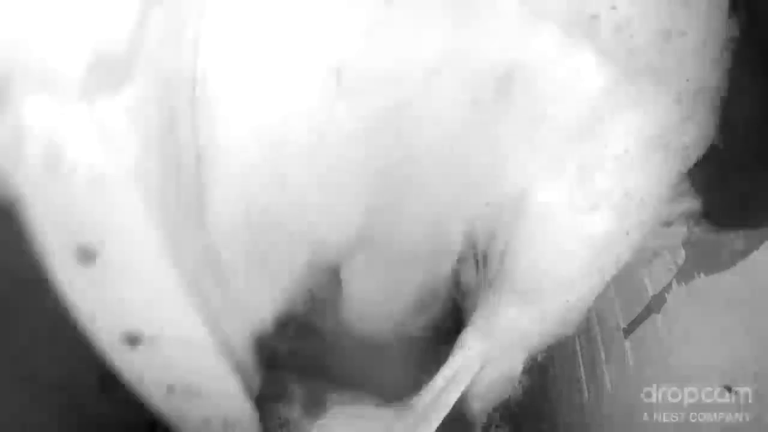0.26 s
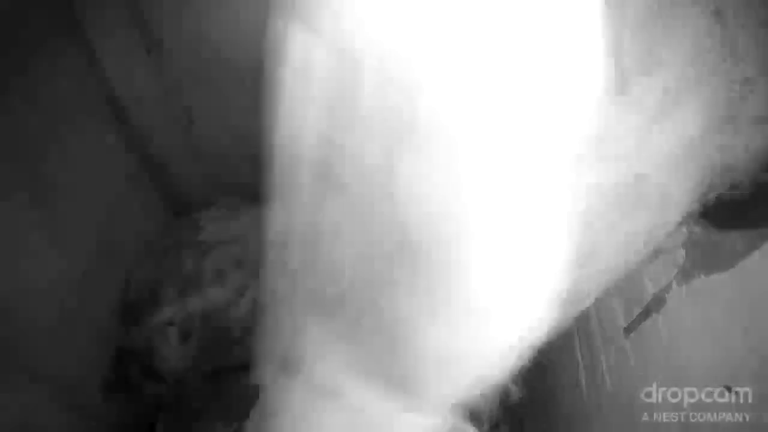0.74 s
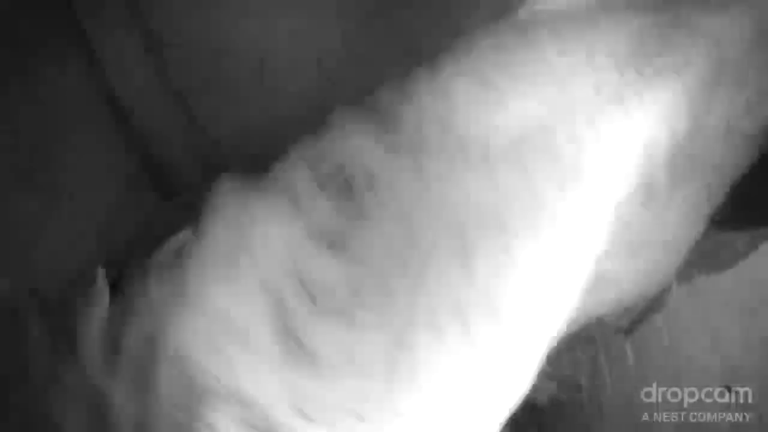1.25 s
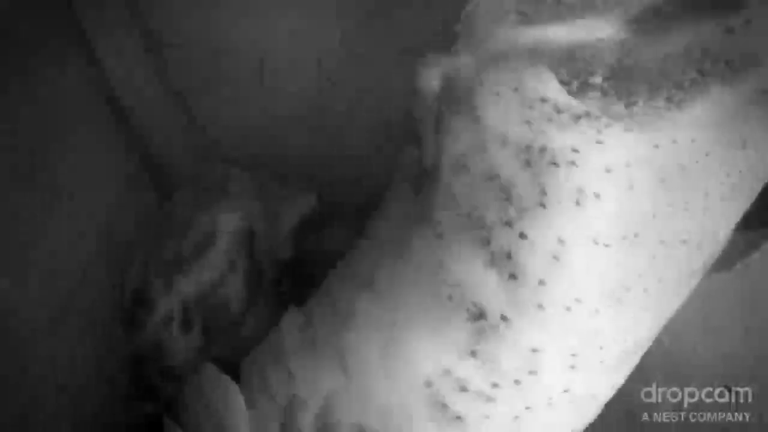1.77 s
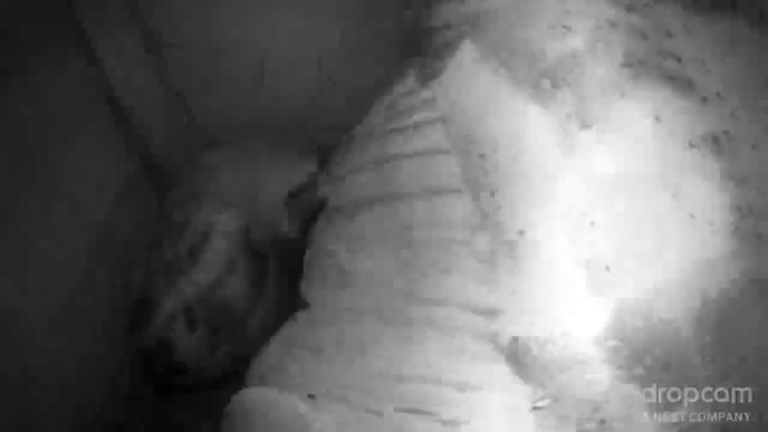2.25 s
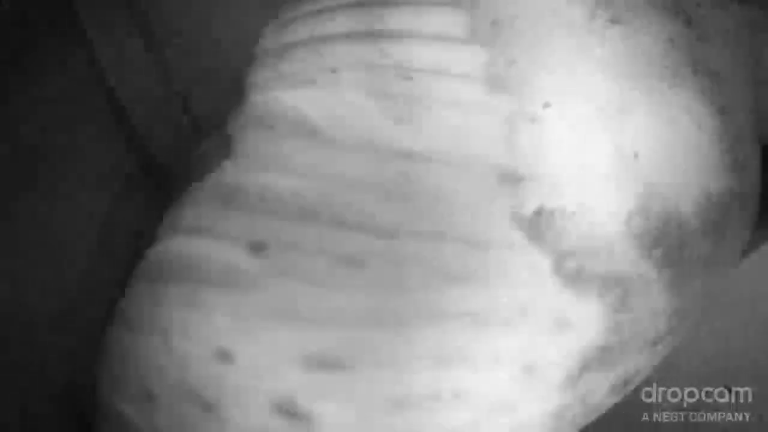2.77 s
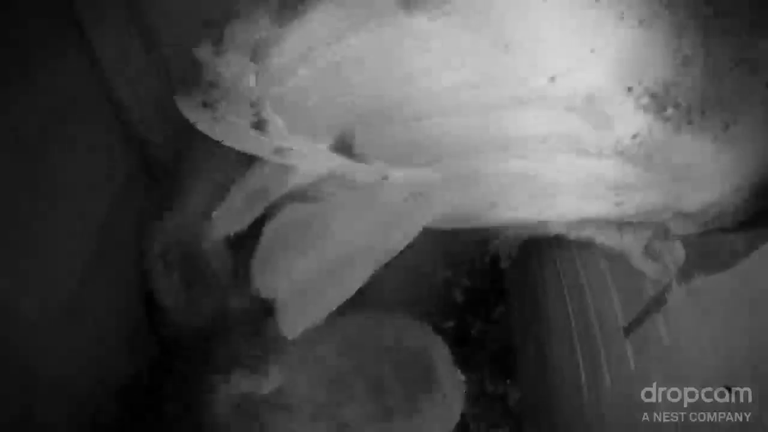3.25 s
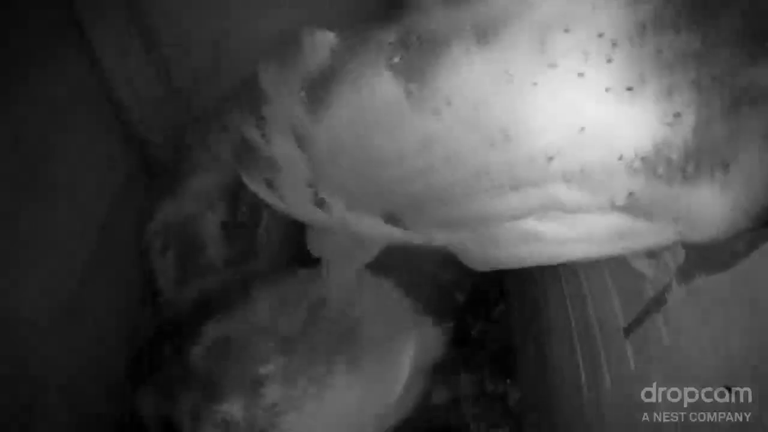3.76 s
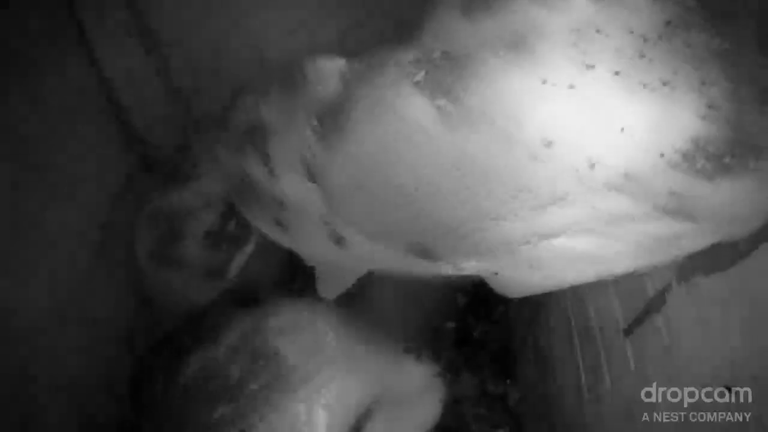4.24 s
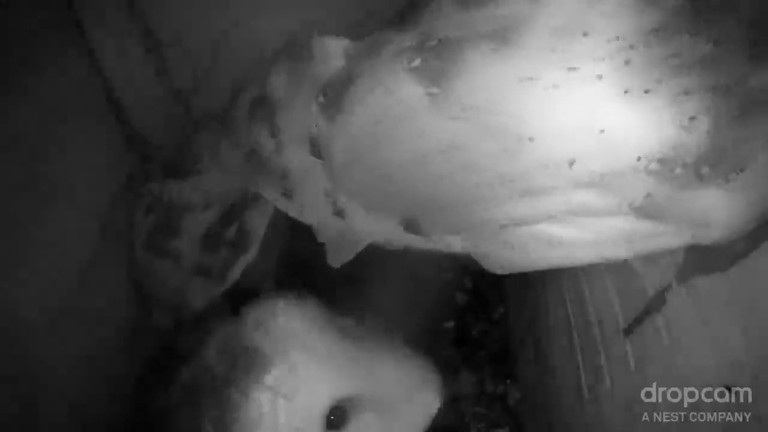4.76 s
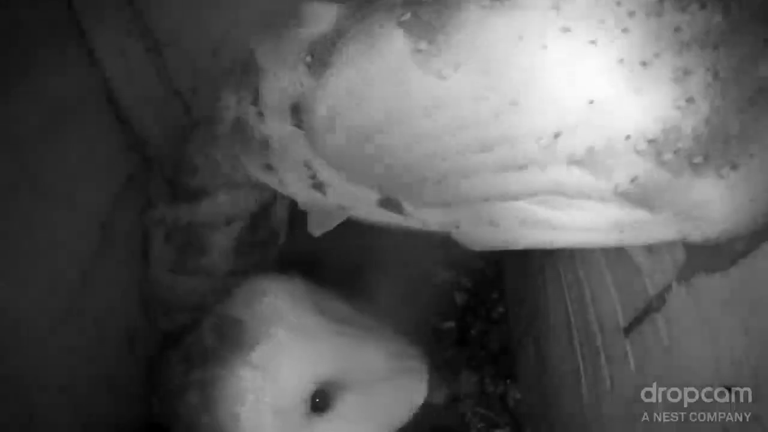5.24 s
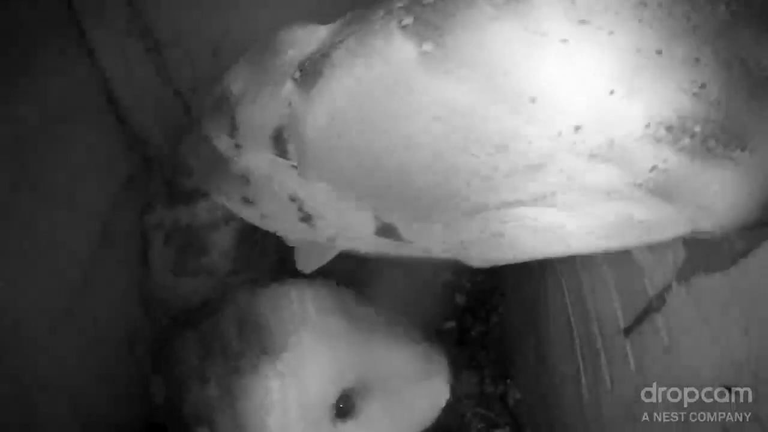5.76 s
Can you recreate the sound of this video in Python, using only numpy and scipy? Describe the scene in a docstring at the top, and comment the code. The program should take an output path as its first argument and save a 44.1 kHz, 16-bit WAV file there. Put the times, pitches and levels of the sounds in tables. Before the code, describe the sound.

Close inside a wooden box, birds thump and scuff the boards, feathers rustling drily, then settle into sparse, softer knocks.

```python
"""Young owls shuffle about in a wooden nest box, heard close up by a small microphone inside it.
Feet and wings knock the boards: each blow feeds short low modes, and the whole box rumbles on.
Bodies rub the wood in stick-slip, feathers crackle as coloured noise, claws and beaks tick as runs of slips.
Outdoor air noise seeps in through the entrance, and the boards hum faintly with it."""
import sys
import numpy as np
from scipy import signal
from scipy.io import wavfile
from scipy.ndimage import uniform_filter1d

SR = 44100
rng = np.random.default_rng(int(sys.argv[2]) if len(sys.argv) > 2 else 0)


def wrap_up_sound(samples):
    """Save the sound to the file named by the first command line argument, as 16-bit audio."""
    columns = np.atleast_2d(samples).T
    # keep every value between -1 and 1, then stretch to whole-number steps
    tamed = np.clip(columns, -1, 1)
    steps = np.round(tamed * 32767).astype(np.int16)
    wavfile.write(sys.argv[1], SR, steps)


N = 265041

# Box modes, one list each for base frame, floor board, back wall, side walls, lid and whole box.
# Each row: frequency in Hz, relative level in dB, ring time to -60 dB in seconds.
BOX_MODES = [
    [(232.5, -20, 0.046), (254.3, -20.5, 0.043)],
    [(286.7, -10.5, 0.17), (320.4, 1, 0.13)],
    [(383, 2, 0.2), (423.6, 9.5, 0.083)],
    [(534.1, 9, 0.095), (598, 5, 0.084), (700, 6, 0.064)],
    [(768, -13.5, 0.066), (871.6, -8, 0.06), (1027, -17.5, 0.053)],
    [(44.3, -10, 0.2), (77, -21.5, 0.66), (151, -1, 0.052), (194, -8, 0.028)],
]
WHOLE_BOX = BOX_MODES[-1]

# Colour of the outdoor air inside the box. Each row: frequency in Hz, relative level per hertz in dB.
AIR_SPECTRUM = [(18, -66), (30, -5.5), (81, -12.5), (229, -24), (399, -2), (539, 2), (727, -1), (798, -4.5),
                (895, 4.5), (1150, -13.5), (4720, -21), (6380, -28.5), (7500, -59.5), (9000, -75)]
AIR_DB, AIR_IN_BOARDS_DB = -62.5, -69

# Brushes of wing and body along the boards. Each row: start in seconds, hold in seconds, rubbing in dB,
# feathers (quills) in dB, barbs relative to the quills in dB.
BRUSHES_ALONG_BOARDS = [(0.0, 0.028, -50, -64.5, 6.5), (0.248, 0.044, -56, -62.5, 0.5),
                        (0.283, 0.069, -50, -64.5, 5.5), (0.767, 0.088, -66.5, -69.5, 3.5),
                        (0.949, 0.066, -56, -60, -6.5), (1.046, 0.041, -52.5, -52, -9),
                        (1.16, 0.054, -53.5, -58.5, -11), (1.226, 0.021, -59, -52, -12),
                        (1.26, 0.041, -54, -59, -7.5), (1.349, 0.061, -49.5, -51, -5.5),
                        (1.522, 0.024, -41.5, -46.5, -13), (1.58, 0.054, -45.5, -51.5, 1),
                        (1.667, 0.012, -40, -56.5, -1), (1.725, 0.014, -63, -60.5, -2),
                        (1.79, 0.16, -56.5, -64, -2.5), (2.139, 0.018, -49.5, -57, -9),
                        (2.309, 0.055, -50, -63, 3.5), (2.453, 0.014, -38, -44, -10.5),
                        (2.57, 0.15, -76, -72.5, 2.5), (2.79, 0.082, -61, -69, 3),
                        (2.978, 0.068, -57.5, -61, 0.5), (3.089, 0.018, -50.5, -55.5, -3.5),
                        (3.168, 0.052, -46, -63, -5.5), (3.398, 0.089, -52.5, -60, -11),
                        (3.61, 0.016, -59.5, -64, -6), (3.835, 0.015, -63, -64, -7),
                        (4.296, 0.014, -52, -74.5, -1), (5.167, 0.11, -59.5, -72, -5.5),
                        (5.399, 0.046, -54, -71.5, -4), (5.7, 0.11, -59, -72, -19)]
BRUSH_RISE_DB_PER_S, BRUSH_FALL_DB_PER_S = 315, 224

# Small stirrings at rest. One row: rubbing in dB, quills in dB, barbs in dB.
STIRRINGS_AT_REST = [-70.5, -75, -82]

# Dull feather noise of the quills. Each row: frequency in Hz, relative level per hertz in dB.
QUILL_SPECTRUM = [(590, -3.5), (1000, -2), (1270, -16.5), (1520, 1), (2360, -20), (2600, -10.5),
                  (3380, -56), (5720, -120)]

# Bright feather noise of the barbs. Each row: frequency in Hz, relative level per hertz in dB.
BARB_SPECTRUM = [(1530, -6.5), (2600, 4.5), (4030, 5), (4530, -1), (6030, 0), (7230, -8.5), (8670, -28.5),
                 (11300, -88)]

# Upper modes of the air in the box.
# Each row: frequency in Hz, width in Hz, nominal lift in dB (half of it, times UPPER_SHARE, is mixed in).
BOX_AIR_MODES = [(1337, 33, 12.5), (2163, 30, 10.5)]
UPPER_SHARE = 0.69

# Knocks on the wood. Each row: start in seconds, strength in dB, spot struck (-1 base frame, 0 floor board,
# 1 back wall, 2 side walls, 3 lid), loss per part away from the spot in dB, thump of the whole box in dB,
# dull scratch in dB, bright scratch relative to the dull in dB, contact time in seconds.
BLOWS = [(0.261, -21.5, 1.39, 10, -34, -44, -10, 0.005), (0.369, -30.5, 1.33, 6, -65, -51, -12, 0.0038),
         (0.38, -35.5, 2.5, 14, -65, -67, -11, 0.0041), (0.679, -52.5, 2.5, 1.5, -84, -62, -4, 0.00084),
         (1.372, -32, 1.5, 11.5, -67, -70, -23, 0.0096), (1.39, -29, 1.37, 14.5, -70, -70, -20, 0.0068),
         (1.5015, -9.5, -0.5, 5, -32.5, -39.5, -0.5, 0.0011),
         (1.519, -16.5, 1.56, 21.5, -27, -52, 5, 0.004), (1.584, -34.5, 0, 13, -60.5, -48, 5, 0.0099),
         (1.596, -29, 3.5, 3, -43, -40, -15, 0.0027), (1.635, -19.5, 2, 12, -59, -59, -10, 0.0069),
         (1.6415, -10.5, 1.5, 9, -24, -49, -8, 0.0011), (1.648, -14, 3, 5, -44.5, -58, -10, 0.0013),
         (1.839, -35, 0.9, 8.5, -41, -83, -21, 0.002), (2.138, -36, 2.5, 18, -42, -44.5, 5.5, 0.013),
         (2.147, -21.5, 1.5, 10.5, -43, -34, -3.5, 0.0073), (2.416, -30, 1.4, 4.5, -61, -43, 13, 0.019),
         (2.433, -20.5, 3, 15, -55, -47, -30, 0.011), (2.469, -19.5, 2, 5, -25, -55, -29, 0.0051),
         (2.842, -38.5, -1, 16, -47, -57, -32, 0.016), (3.082, -37.5, 2.7, 6.5, -72, -63, 9, 0.013),
         (3.107, -34.5, 0.86, 11, -45, -66, -10, 0.0027), (3.137, -42.5, 2, 17, -60, -58, -26, 0.0047),
         (3.151, -33, 0.46, 12, -54, -75, -12, 0.003), (3.222, -27, 0.13, 12, -41.5, -80, -13, 0.001),
         (3.473, -35, 1.56, 11.5, -65, -89, 0, 0.0089), (3.814, -49.5, 1.5, 13, -88, -87, -16, 0.0037),
         (4.277, -33, 1.62, 14.5, -48.5, -63, -18, 0.0042), (4.565, -43.5, 1.5, 23, -83, -87, -14, 0.0045),
         (4.815, -47, 3.5, 4, -54, -77, -9, 0.015), (4.874, -44, 1.5, 6.5, -54, -95, -10, 0.0059),
         (4.95, -30, 0.32, 13, -44, -68, -9, 0.0071), (5.15, -32, 0.5, 18.5, -77, -88, -11, 0.021),
         (5.243, -52, 1, 13, -82, -75, -15, 0.0024), (5.386, -27, 1.2, 11, -39.5, -58, -12.5, 0.004),
         (5.41, -33.5, 0.2, 16, -66, -78, -8, 0.002), (5.429, -32.5, 1, 15, -47, -74, -16, 0.014),
         (5.802, -18, 4, 6.5, -47.5, -42, -26, 0.0061), (5.867, -39, 2, 11, -54, -76, -16, 0.018),
         (5.903, -34, 1.05, 21.5, -77, -82, -9, 0.0026), (5.952, -37.5, 1.5, 21, -72, -75, -7, 0.006)]
CHATTER = 0.3   # share of rough, uneven pushing in a touch
SCRATCH_S = 0.0057
TOUCH_SAMPLES = 3000   # longest touch worked out

# After a knock the bird settles and the boards murmur on.
SETTLE_DB, SETTLE_DELAY_S, SETTLE_T60_S = -22.5, 0.12, 0.52

# After a thump the whole box rocks on its mount.
RUMBLE_DB, RUMBLE_T60_S = -12.5, 0.55   # level relative to the thump

# Ticks and short scrapes of claw or beak. Each row: start in seconds, strength in dB, pitch struck in Hz,
# loss per octave away from that pitch in dB, length in seconds.
CLAW_TICKS = [(0.262, -42, 1720, 20, 0.01), (0.279, -43, 3700, 16, 0.016), (0.298, -43, 4600, 6, 0.025),
              (0.322, -57, 3000, 16, 0.013), (0.366, -54, 1880, 14, 0.017), (1.231, -37, 1430, 29, 0.021),
              (1.4997, -34.5, 2980, 7.5, 0.008), (1.518, -25.5, 2800, 25, 0.011),
              (1.558, -39, 3180, 18, 0.012), (1.578, -32, 4580, 6, 0.013), (1.598, -31, 2600, 5, 0.02),
              (1.643, -31.5, 2400, 7, 0.013), (1.653, -30.5, 3120, 18, 0.014),
              (1.788, -43.5, 3000, 17, 0.015), (2.138, -25, 2100, 40, 0.0025),
              (2.146, -18.5, 1980, 37, 0.0038), (2.414, -36, 3030, 9, 0.009), (2.434, -32, 2120, 19, 0.014),
              (2.469, -35.5, 1590, 27, 0.036), (3.094, -51, 3480, 10, 0.016), (4.278, -52, 2000, 4, 0.0052),
              (4.955, -59, 2500, 15, 0.007), (5.387, -44.5, 2440, 24, 0.008), (5.39, -40, 3770, 26, 0.039),
              (5.793, -40, 1200, 28, 0.0046), (5.804, -27.5, 1690, 5, 0.01)]
SLIPS = 14   # in one scrape
SKID_LOSS_DB = 8.5   # over the full length of a scrape
TICK_SPREAD_DB = 2.5   # chance in how hard a tick finds each mode

# Short high modes of the wood that the ticks ring.
# Each row: frequency in Hz, relative level in dB, ring time to -60 dB in seconds.
GRAIN_MODES = [(1110, 4, 0.062), (1464, 7.5, 0.016), (1780, -3, 0.018), (1960, -4.5, 0.01),
               (2076, 1, 0.026), (2424, 0, 0.027), (2660, -4.5, 0.014), (3200, -3, 0.028),
               (3506, -2, 0.021), (3870, -5, 0.018), (4470, -7, 0.017), (6080, -21.5, 0.0077)]

MICROPHONE_LOW_HZ, MICROPHONE_TOP_HZ, CUTOFF_HZ = 105, 7480, 8829


def from_db(db):
    """Decibels to gain."""
    return 10 ** (np.asarray(db) / 20)


def rms_one(x):
    """Scaled to rms 1."""
    return x / np.sqrt(np.mean(x ** 2) + 1e-20)


def drift(rate_hz):
    """Slow chance: noise through a double one-pole low-pass, worked out at every 16th sample; spread 1."""
    r = np.exp(-32 * np.pi * rate_hz / SR)
    noise = rng.standard_normal(N // 16 + 3001)
    slow = signal.lfilter([1], [1, -2 * r, r * r], noise)[3000:]   # without the filter's start-up
    return np.interp(np.arange(N) / 16, np.arange(len(slow)), rms_one(slow))


def ring(x, hz, t60):
    """A damped resonator: a unit click sets a sine of height 1 ringing."""
    r = from_db(-60 / (t60 * SR))
    w = 2 * np.pi * hz / SR
    return signal.lfilter([0, np.sin(w)], [1, -2 * r * np.cos(w), r * r], x + 1e-18)


def ring_modes(x, modes):
    """All modes of a list ringing side by side at their levels."""
    return sum(from_db(db) * ring(x, hz, t60) for hz, db, t60 in modes)


def every_box_mode():
    """The modes of all parts of the box in one list."""
    return [mode for modes in BOX_MODES for mode in modes]


def coloured(x, spectrum, patchy_db):
    """Third-octave bands weighted by a spectrum, each flickering on its own; white rms 1 in, about rms 1 out."""
    hz, db = np.transpose(spectrum)
    edges = hz[0] * 2 ** np.arange(0, np.log2(hz[-1] / hz[0]), 1 / 3)
    out, power = 0, 0
    for low, high in zip(edges, edges[1:]):
        gain = from_db(np.interp(np.log(low * high) / 2, np.log(hz), db))
        band = signal.sosfilt(signal.butter(2, [low, high], "band", fs=SR, output="sos"), x)
        flicker = from_db(patchy_db * drift(22.0))
        out = -out + gain * band * flicker   # signs alternate so that neighbours add at their common edge
        power += 2 * gain ** 2 * (high - low) / (SR / 2)
    return out / np.sqrt(power)


def grains(per_s, spread_db):
    """Random micro-contacts of uneven size and either sign, rms 1."""
    sizes = from_db(spread_db * np.minimum(rng.exponential(1, N), 4))
    signs = rng.choice([-1, 1], N)
    happens = rng.random(N) < per_s / SR
    return rms_one(sizes * signs * happens)


def contact(seconds, rise):
    """Envelope of one touch: a rise (sharper for small values), then a dying skid; top 1."""
    t = np.arange(TOUCH_SAMPLES) / SR / max(seconds, 1e-3)
    return (2 * np.e * t / rise) ** rise * np.exp(-2 * t)


def outdoor_air():
    """Steady noise through the entrance, and the boards humming faintly with it."""
    wind = rng.standard_normal(N)
    boards = ring_modes(wind, every_box_mode())
    direct = coloured(rng.standard_normal(N), AIR_SPECTRUM, patchy_db=-1.1)
    return from_db(AIR_DB) * direct + from_db(AIR_IN_BOARDS_DB) * rms_one(boards)


def shuffling():
    """Gains of rubbing, quills and barbs: rest, plus each brush (swell, hold, fade), plus settling after knocks."""
    t = np.arange(0, N, 32) / SR
    power = from_db(STIRRINGS_AT_REST)[:, None] ** 2
    for s, hold_s, rub_db, quill_db, bright_db in BRUSHES_ALONG_BOARDS:
        before_db = BRUSH_RISE_DB_PER_S * np.maximum(s - t, 0)
        after_db = BRUSH_FALL_DB_PER_S * np.maximum(t - s - hold_s, 0)
        levels_db = np.c_[[rub_db, quill_db, quill_db + bright_db]]
        power = power + from_db(levels_db - before_db - after_db) ** 2
    for s, hit_db, *_ in BLOWS:   # settling only rubs the boards
        after = np.maximum(t - s, 0)
        fade = from_db(hit_db + SETTLE_DB - 60 * after / SETTLE_T60_S)
        power[0] += (fade * np.minimum(after / SETTLE_DELAY_S, 1)) ** 2
    return [np.interp(np.arange(N) / SR, t, np.sqrt(p)) for p in power]


def rubbing(gain):
    """Stick-slip of bodies on the boards keeps all modes murmuring in uneven surges."""
    slips = grains(1500, spread_db=1.5) * from_db(0.37 * drift(39))
    wood = 0
    for hz, db, t60 in every_box_mode():
        wood = wood + from_db(db + 4.0 * drift(7.9)) * ring(slips, hz, t60)
    return gain * rms_one(wood)


def feathers(gain, spectrum):
    """Thousands of tiny slips of feather and claw: a dense crackle in clumps, its colour shifting."""
    slips = grains(8000, spread_db=2.8) * from_db(2.2 * drift(50))
    return coloured(gain * slips, spectrum, patchy_db=3.2)


def hollow(x):
    """The enclosed air lifts a few narrow treble bands."""
    out = x.copy()
    for hz, width_hz, db in BOX_AIR_MODES:
        r = np.exp(-np.pi * width_hz / SR)
        top = (1 - r * r) / 2 * np.array([1, 0, -1])   # close to unit gain at the peak
        bottom = [1, -2 * r * np.cos(2 * np.pi * hz / SR), r * r]
        out += UPPER_SHARE * from_db(db / 2) * signal.lfilter(top, bottom, x)
    return out


def knocks():
    """Wood rung by each blow, strongest near the spot struck, over the whole time of contact."""
    s, hit_db, spot, loss_db, thump_db, _, _, contact_s = np.transpose(BLOWS)
    starts = np.round(s * SR).astype(int)
    shapes = np.array([contact(c, rise=0.42) for c in contact_s])
    area = shapes.sum(axis=1, keepdims=True)
    energy = np.sum(shapes ** 2, axis=1, keepdims=True)
    t = np.arange(TOUCH_SAMPLES) / SR
    wood = 0
    for part, modes in enumerate(BOX_MODES, start=-1):
        part_db = thump_db if modes is WHOLE_BOX else hit_db - loss_db * abs(part - spot)
        loudest_db = max(mode[1] for mode in modes)
        for k, (hz, db, t60) in enumerate(modes):
            # pushing in step with the mode feeds it over the whole touch
            swell = np.cos(2 * np.pi * hz * t) * (-1) ** k * 2 / area
            chatter = CHATTER * rng.standard_normal(shapes.shape) / np.sqrt(energy)
            touches = from_db(part_db + db - loudest_db)[:, None] * shapes * (swell + chatter)
            pushes = np.zeros(N + TOUCH_SAMPLES)
            for start, touch in zip(starts, touches):
                pushes[start:start + TOUCH_SAMPLES] += touch
            wood = wood + ring(pushes[:N], hz, t60)
    return wood


def knock_scratches():
    """How hard claws and quills scratch (dull, bright) during each knock, as brief gain envelopes."""
    scratch = np.zeros((2, N + TOUCH_SAMPLES))
    shape = contact(SCRATCH_S, rise=0.77)
    for s, _, _, _, _, dull_db, bright_db, _ in BLOWS:
        start = int(np.round(s * SR))
        scratch[:, start:start + TOUCH_SAMPLES] += from_db([[dull_db], [dull_db + bright_db]]) * shape
    return scratch[:, :N]


def rumble():
    """Low modes of the whole box, kept going by noise that dies after each thump."""
    power = np.zeros(N)
    for s, _, _, _, thump_db, *_ in BLOWS:
        power[round(s * SR)] = from_db(thump_db + RUMBLE_DB) ** 2
    power = signal.lfilter([1], [1, -from_db(-120 / (RUMBLE_T60_S * SR))], power)   # power, so twice 60
    gain = uniform_filter1d(np.sqrt(power), size=801, origin=400)   # softens each onset over 18 ms
    return gain * rms_one(ring_modes(rng.standard_normal(N), WHOLE_BOX))


def ticks():
    """Each scrape is a dying run of uneven slips; every slip rings the high modes near its pitch."""
    s, db, pitch_hz, loss_db, length_s = np.transpose(CLAW_TICKS)[:, :, None]
    along = np.sort(rng.random((len(CLAW_TICKS), SLIPS)), axis=1)
    along = along - along[:, :1]   # the first slip falls on the start
    when = np.round((s + length_s * along) * SR).astype(int)
    out = 0
    for hz, mode_db, t60 in GRAIN_MODES:
        away_db = loss_db * abs(np.log2(hz / pitch_hz))
        chance_db = TICK_SPREAD_DB * rng.standard_normal((len(CLAW_TICKS), 1))
        slip_db = db + mode_db - away_db + chance_db - SKID_LOSS_DB * along
        uneven = rng.standard_normal(along.shape) / np.sqrt(SLIPS)   # chance in strength and sign
        clicks = np.zeros(N)
        np.add.at(clicks, when, from_db(slip_db) * uneven)
        out = out + ring(clicks, hz, t60)
    return out


def scene():
    """All sources at the one microphone inside the box."""
    rub, quill, barb = shuffling()
    dull, bright = knock_scratches()
    plumage = feathers(quill + dull, QUILL_SPECTRUM) + feathers(barb + bright, BARB_SPECTRUM)
    mix = outdoor_air() + rubbing(rub) + hollow(plumage) + knocks() + rumble() + ticks()
    return mix[None]


def record(dry):
    """A narrow-band microphone: thin bass, treble falling off sharply, then cut."""
    thin = signal.sosfilt(signal.butter(2, MICROPHONE_LOW_HZ, "high", fs=SR, output="sos"), dry)
    # treble is 14 dB down from the microphone's top, then at least 70 dB down from the cutoff
    narrow = signal.sosfilt(signal.cheby2(6, 14, MICROPHONE_TOP_HZ, fs=SR, output="sos"), thin)
    return signal.sosfilt(signal.cheby2(12, 70, CUTOFF_HZ, fs=SR, output="sos"), narrow)


dry = scene()
out = record(dry)
wrap_up_sound(out)
```